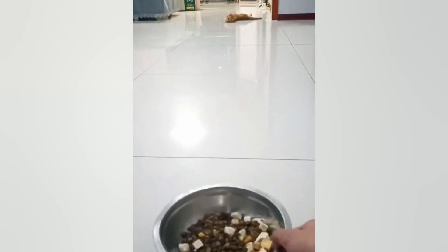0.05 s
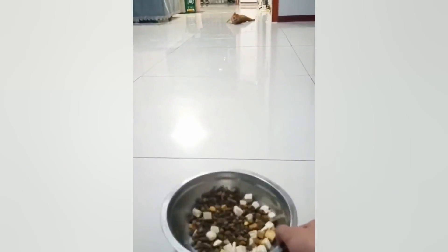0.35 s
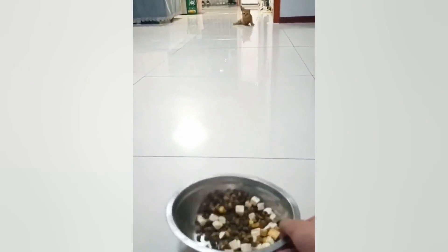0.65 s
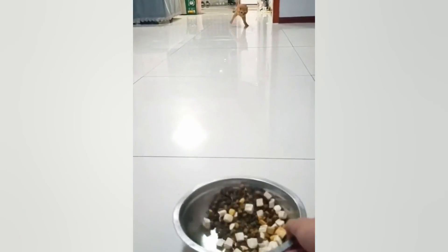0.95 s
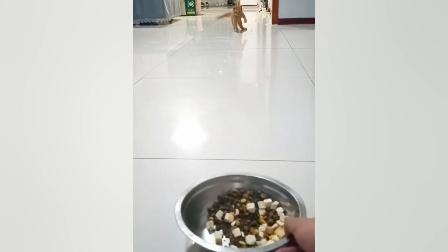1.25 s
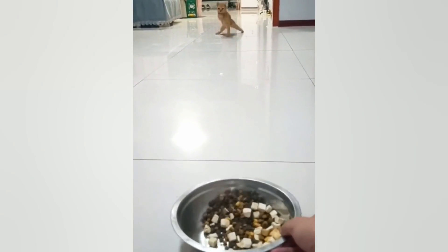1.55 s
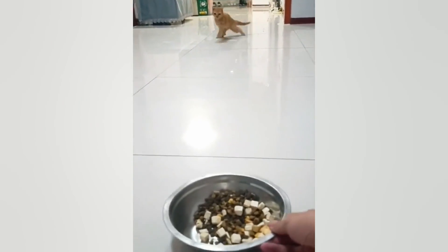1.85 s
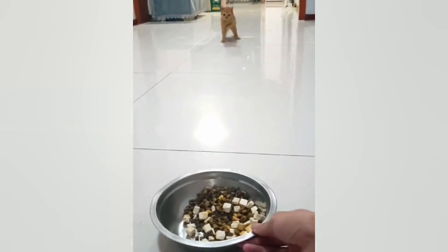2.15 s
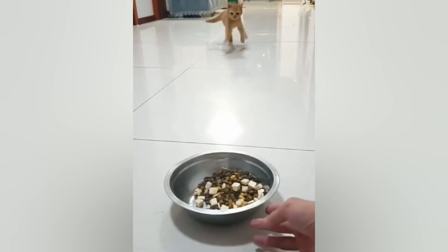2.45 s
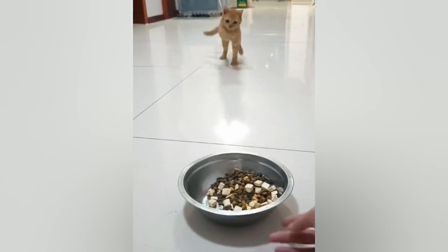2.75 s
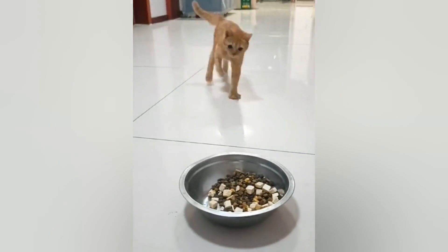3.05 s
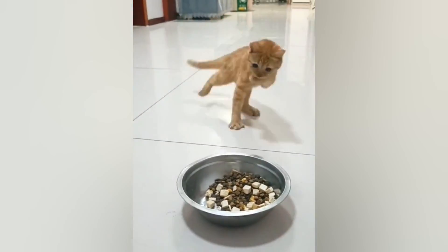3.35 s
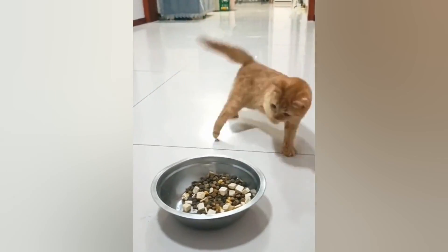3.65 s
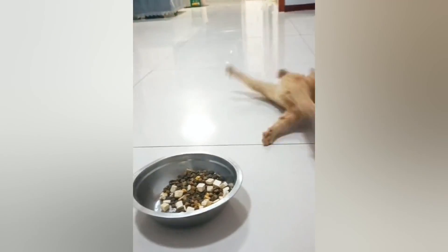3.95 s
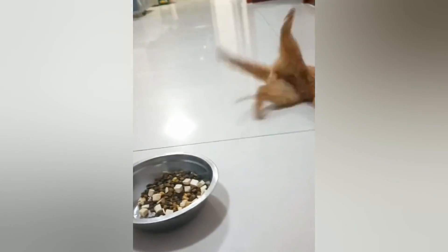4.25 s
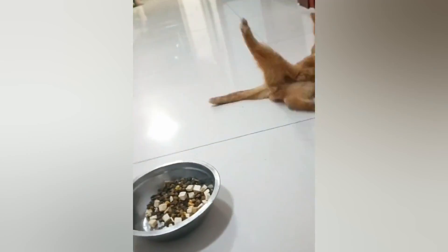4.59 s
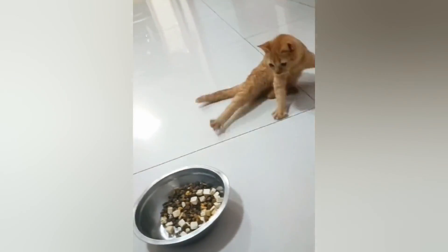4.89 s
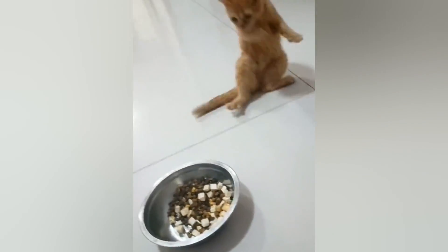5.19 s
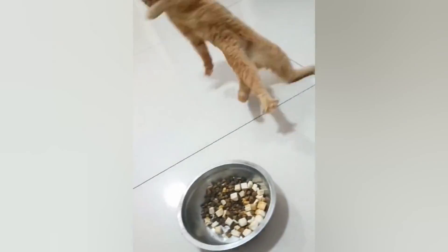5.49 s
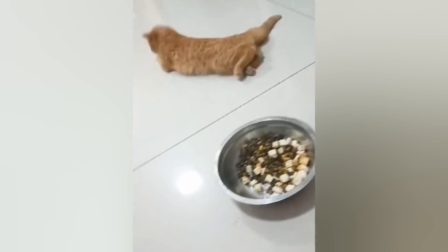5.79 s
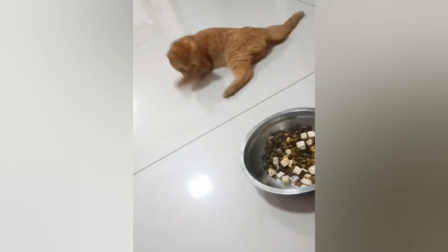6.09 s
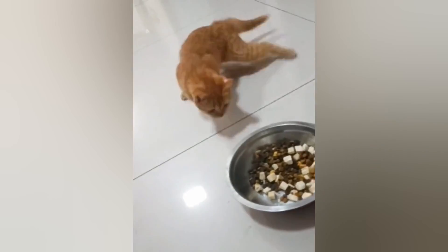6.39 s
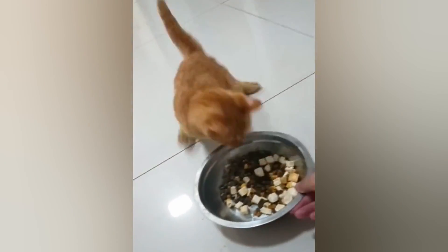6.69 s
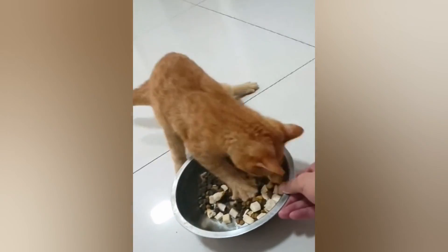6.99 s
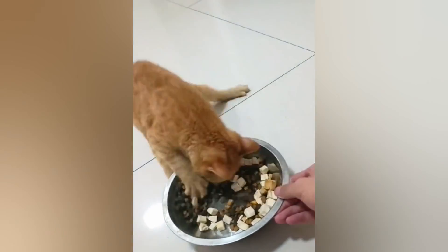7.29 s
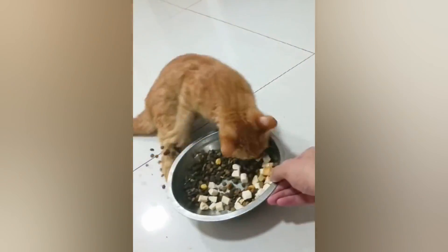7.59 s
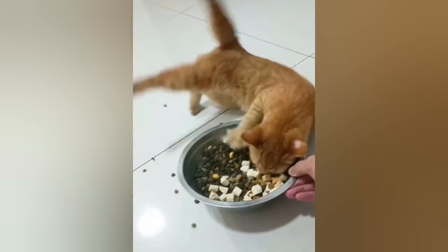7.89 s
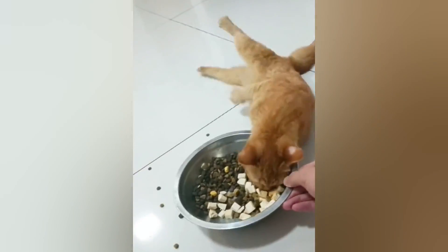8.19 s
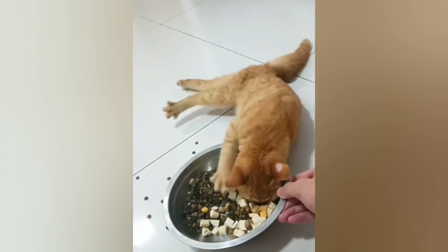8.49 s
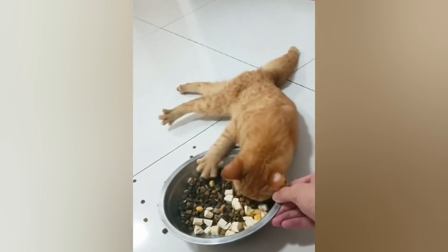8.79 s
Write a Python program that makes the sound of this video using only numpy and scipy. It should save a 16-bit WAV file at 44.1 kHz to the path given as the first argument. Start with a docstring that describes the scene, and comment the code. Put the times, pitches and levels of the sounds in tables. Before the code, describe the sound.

A steel bowl of dry cat food is shaken close by, each toss a bright shower of clicks with a short metallic ring. A kitten then gallops closer on softly thudding paws and ticking claws, skids and tumbles with a hiss of fur. It pounces into the bowl, rustling through the pellets and crunching them. The tiled room echoes.

```python
"""A steel bowl of dry cat food is shaken close by in a tiled, echoing room.
Each toss lands as a shower of tiny clicks that sets the steel ringing.
A kitten gallops up on thudding paws and ticking claws, skids and tumbles with a hiss of fur,
then pounces into the bowl, pushes through the pellets with its nose and crunches them."""
import sys
import numpy as np
from scipy import signal
from scipy.fft import rfft, irfft, next_fast_len
from scipy.io import wavfile
from scipy.ndimage import map_coordinates

SR = 44100
rng = np.random.default_rng(int(sys.argv[2]) if len(sys.argv) > 2 else 0)


def generate_wav(signal):
    """Clip the signal to [-1, 1] and save it as 16-bit WAV at the path in sys.argv[1]."""
    frames = np.transpose(np.atleast_2d(signal))
    scaled = np.clip(frames, -1, 1) * 32767
    pcm = np.round(scaled).astype(np.int16)
    wavfile.write(sys.argv[1], SR, pcm)


N = 398663
TOP_HZ = 16000

# tossed food lands in the bowl: t/s, clatter/dB, knock/dB, scatter/s, rim/dB, clack/dB, clack pitch/Hz
TOSSES = [(0.0, -18.5, -27, 0.0091, -35, -30.5, 2840), (0.139, -30, -44, .016, -52.5, -43.5, 3000),
          (.354, -16.5, -38, .0047, -47, -37, 3400), (.486, -23.5, -29, .007, -48, -35.5, 3380),
          (.654, -14.5, -30, 0.0063, -43, -27, 3240), (.864, -16.5, -27, .003, -49, -22.5, 3000),
          (.877, -18.5, -42, .0013, -50, -32, 3400), (1.041, -13.5, -20.5, 0.0015, -42, -27, 3500),
          (1.2145, -14, -20, .0009, -49.5, -24, 3620), (1.3939, -15.5, -23.5, 0.00089, -54, -25, 3130),
          (1.548, -16, -22.5, 0.0011, -44, -26, 3000), (1.8322, -23.5, -57, .0018, -62, -59, 2850),
          (1.988, -37.5, -69, 0.0042, -66, -44, 3430), (2.175, -29, -55, 0.0057, -55, -55, 3000),
          (2.214, -34, -37, .011, -66, -54, 2870)]
# paws and body land on the tiles: t/s, thud/dB, thud pitch/Hz, pad slap/dB, claw tick/dB, thud decay/s
LANDINGS = [(2.031, -36.5, 258, -65, -54.5, 0.037), (2.408, -32.5, 466, -45, -56, .015),
            (2.425, -49, 450, -48, -53.5, .012), (2.572, -34, 560, -49, -57.5, 0.025),
            (2.738, -37, 495, -50, -59.5, 0.011), (2.887, -35, 344, -52, -82.5, .016),
            (2.93, -49, 218, -56.5, -42.5, 0.013), (3.1, -33.5, 401, -51, -41, 0.014),
            (3.347, -35.5, 429, -47, -45.5, .0088), (3.538, -41, 375, -46, -60, 0.024),
            (3.606, -41.5, 502, -41.5, -41.5, 0.017), (3.665, -35, 213, -60, -53, 0.019),
            (3.747, -23.5, 550, -32, -33, 0.0043), (3.796, -37, 523, -52, -59.5, 0.0094),
            (3.852, -21.5, 346, -46, -53, .012), (4.035, -35.5, 259.9, -46.5, -46, 0.017),
            (4.095, -29, 300, -46, -66, .012), (4.187, -19, 476, -40, -43, 0.014),
            (4.206, -24, 486, -39.5, -46, 0.012), (4.297, -38, 520, -44, -52, .009),
            (4.471, -50, 416, -52, -31, .012), (4.512, -30, 237, -39.5, -31.5, 0.019),
            (4.548, -29, 520, -36.5, -28, 0.012), (4.831, -31.5, 233, -62.5, -64.5, 0.0075),
            (4.944, -22, 290, -38.5, -36.5, 0.0063), (4.956, -25, 234, -64, -53.5, .02),
            (4.998, -30, 231, -47, -67.5, 0.014), (5.204, -47.5, 350, -58, -56, 0.02),
            (5.234, -35, 410, -50.5, -54, 0.032), (5.961, -54, 352, -75.5, -62.5, 0.01),
            (6.052, -42, 330, -66, -66, .009), (6.212, -47.5, 228, -68, -58.5, 0.013),
            (6.27, -36, 322, -50, -51.5, .014)]
# tone of a dull knock on the bowl: f/Hz, level/dB
KNOCK_TONE = [(30, -17.5), (70, -18.5), (150, -8.5), (230, -2), (340, -1.5), (480, -1.5), (750, -6),
              (1100, -9.5), (1600, -18), (4000, -48)]


def amp(db):
    """Turn decibels into a gain."""
    return 10 ** (np.asarray(db) / 20)


def along(points, hz):
    """Read a (f/Hz, value) table at any frequency, on a log axis."""
    f, values = np.transpose(points)
    return np.interp(np.log(hz + 1), np.log(f), values)


def level(curve, times):
    """Read a (t/s, level/dB) curve, which is silent beyond its ends."""
    return np.interp(times, *np.transpose(curve), left=-140, right=-140)


def add(track, start, sound):
    """Mix a sound into a track at `start` seconds."""
    part = track[..., max(round(start * SR), 0):][..., :sound.shape[-1]]
    part += sound[..., :part.shape[-1]]


def filtered(x, response):
    """Scale each frequency of x by response(hz)."""
    size = next_fast_len(N + SR // 4)
    return irfft(rfft(x, size) * response(np.fft.rfftfreq(size, 1 / SR)), size)[..., :N]


def convolved(x, kernel):
    """Pass x through a filter, given as its answer to one click."""
    return signal.oaconvolve(x, np.atleast_2d(kernel), axes=1)[:, :N]


def coloured(x, tone, size=4096):
    """Give x a (f/Hz, level/dB) tone; white noise keeps its power."""
    cepstrum = irfft(np.log(amp(along(tone, np.fft.rfftfreq(size, 1 / SR)))))
    # folded so that the filter never sounds ahead of a hit
    cepstrum[1:size // 2] *= 2
    cepstrum[size // 2:] = 0
    kernel = irfft(np.exp(rfft(cepstrum)))
    return convolved(x, kernel / np.linalg.norm(kernel))


def changing(x, kernels):
    """Pass x through filters that fade into each other, one round a second."""
    turn = np.arange(N) / SR + np.arange(len(kernels))[:, None] / len(kernels)
    shares = np.maximum(np.cos(2 * np.pi * turn), 0)
    shares /= np.linalg.norm(shares, axis=0)
    return sum(convolved(x * share, kernel / np.linalg.norm(kernel[0]))
               for share, kernel in zip(shares, kernels))


def wavering(hz, width_hz, t):
    """A tone that drifts at random, blurring its pitch over width_hz."""
    drift = np.cumsum(rng.standard_normal(len(t))) * np.sqrt(2 * np.pi * width_hz / SR)
    return np.sin(2 * np.pi * hz * t + drift)


def ringing(tones, width_hz, t):
    """Wavering tones, each fading by 60 dB in its ring time."""
    return sum(amp(db - 60 * t / ring_s) * wavering(hz, width_hz, t) for hz, db, ring_s in tones)


def band_noise(hz, width_share, t):
    """Stereo noise of strength 1 in a band around hz."""
    edges = np.clip(hz * np.exp(width_share * np.array([-.5, .5])), 20, SR * .48)
    band = signal.butter(2, edges, "band", fs=SR, output="sos")
    noise = signal.sosfilt(band, rng.standard_normal((2, 2 * len(t))))[:, len(t):]
    return noise / noise.std()


def swelling_noise(curve):
    """Stereo white noise, as loud as the curve says."""
    return amp(level(curve, np.arange(N) / SR)) * rng.standard_normal((2, N))


def strokes(start, length, db, rise_s, fall_db_per_s):
    """A (t/s, level/dB) curve of strokes that swell, hold and die away."""
    times = np.linspace(start[0], min(start[-1] + length[-1] + .5, N / SR), 1500)
    age = times[:, None] - start
    gain = np.clip(age / rise_s, 0, 1) * amp(db - fall_db_per_s * np.maximum(age - length, 0))
    return np.column_stack([times, 10 * np.log10(np.sum(gain ** 2, axis=1) + 1e-14)])


def clicks(times, db, rate, uneven_db, decay_s=.00015, size=48):
    """Tiny hard hits, each at its own pitch; `rate` of them a second make the level db."""
    t, count = np.arange(size) / SR, len(times)
    pitch = rng.uniform(0, TOP_HZ, (count, 1))
    phase = rng.uniform(0, 2 * np.pi, (count, 1))
    phase = phase + 1.2 * rng.standard_normal((2, count, 1))  # sets left and right apart
    shape = np.cos(2 * np.pi * pitch * t + phase) * np.exp(-t / decay_s)
    strength = amp(uneven_db * np.clip(rng.standard_normal(count), -2, 2))
    gain = amp(db) * np.sqrt(SR / rate) * strength / np.sqrt(np.mean(strength ** 2))
    shape *= gain[:, None] / np.linalg.norm(shape, axis=2, keepdims=True)
    where = (np.abs(times * SR).astype(int)[:, None] + np.arange(size)).ravel()
    return np.array([np.bincount(where, side.ravel(), N)[:N] for side in shape])


def showers(starts, db, scatter_s, uneven_db, count):
    """From each start, clicks thicken for scatter_s and then thin out."""
    shape = (len(starts), count)
    scatter_s = np.broadcast_to(scatter_s, len(starts))
    times = starts[:, None] - scatter_s[:, None] * np.log(rng.random(shape) * rng.random(shape))
    peak_rate = count / (np.e * scatter_s)
    return clicks(times.ravel(), np.repeat(db, count), np.repeat(peak_rate, count), uneven_db)


def trickle(curve, uneven_db, count):
    """Clicks at random moments, as loud as the curve says."""
    start, end = curve[0][0], curve[-1][0]
    times = rng.uniform(start, end, count)
    return clicks(times, level(curve, times), count / (end - start), uneven_db)


def struck(hit, tones, crack_db, crack_s, width_hz):
    """One hard hit: a crack of noise and a short, rough ring."""
    out, t = np.zeros((2, N)), np.arange(SR // 2) / SR
    start, db = hit
    ring = ringing(tones, width_hz, t)
    crack = amp(crack_db) * np.exp(-t / crack_s) * rng.standard_normal((2, len(t)))
    add(out, start, amp(db) * (ring / 2 + crack))
    return out


def rasps(rows, gain_db, width_share, rise_s, grit_db, grit_s):
    """Short rubs: bands of noise made gritty by a flickering level."""
    out, t = np.zeros((2, N)), np.arange(SR // 4) / SR
    for start, db, hz, decay_s in rows:
        grit = map_coordinates(rng.standard_normal(len(t)), [t / grit_s])
        envelope = (1 - np.exp(-t / rise_s)) * np.exp(-t / decay_s)
        add(out, start, amp(db + gain_db + grit_db * grit) * envelope * band_noise(hz, width_share, t))
    return out


def hush():
    """The faint, steady noise of a quiet room."""
    # tone of the hush: f/Hz, level/dB
    tone = [(25, -19.5), (70, -1), (170, 3.5), (400, 3.5), (700, -5), (1200, -18), (2200, -4),
            (3500, -13.5), (8000, -15), (16000, -21)]
    return amp(-71) * coloured(rng.standard_normal((2, N)), tone)


def room(x, echo_db, build_s=.003, walls_s=.04, spread_s=.025, walls_db=2.5):
    """Tiles and bare walls add a dense, shifting echo that swells as the far walls reply."""
    # how long the echo takes to fade by 60 dB: f/Hz, time/s
    fade_times = [(100, 0.44), (400, 0.64), (1200, 0.68), (3000, 0.62), (8000, 0.46), (15000, 0.4)]
    hz, t, noise = signal.stft(rng.standard_normal((3, 2, SR * 5 // 8)), SR, nperseg=256)
    far_walls = amp(walls_db * np.exp(-((t - walls_s) / spread_s) ** 2))
    swell = (1 - np.exp(-t / build_s)) * far_walls
    fade = amp(-60 * t / along(fade_times, hz)[:, None])
    tails = signal.istft(noise * fade * swell, SR, nperseg=256)[1]
    return x + changing(x * amp(echo_db), tails)


def skids():
    """Fur and feet brush the floor: a grainy hiss over a low rub."""
    # the run-up, then each skid or roll: t/s, length/s, hiss/dB, rub/dB
    brushes = [(1.598, 2.07, -60, -58.5), (3.76, 0.14, -49, -42), (3.91, .12, -54, -54),
               (4.062, 0.16, -42, -45), (4.206, 0.19, -40, -52), (4.43, 0.59, -45.5, -55),
               (5.25, 0.17, -61, -62.5), (5.458, 0.24, -59.5, -71.5), (5.86, 0.061, -61, -94),
               (6.258, 0.083, -45, -53)]
    # tones of the hiss and the rub: f/Hz, level/dB
    fur_tone = [(300, -20), (900, 0), (2300, -2.5), (4500, -3.5), (7600, -0.5), (12000, 10), (16000, -5)]
    rub_tone = [(30, -22), (50, -26.5), (75, -5.5), (130, 1), (220, -1.5), (420, -4.5), (700, -15.5),
                (1500, -40), (4000, -40)]
    start, length, *levels = np.transpose(brushes)
    hiss, rub = (strokes(start, length, db, rise_s=.022, fall_db_per_s=211) for db in levels)
    grains = trickle(hiss, uneven_db=2, count=16000)
    return amp(-4) * (coloured(grains, fur_tone) + coloured(swelling_noise(rub), rub_tone))


def claw_drags():
    """Claws drag over the glaze with a thin, whistling hiss."""
    # each drag: t/s, level/dB, f/Hz, decay/s
    drags = [(2.93, -42, 13500, .012), (3.108, -39, 11200, .03), (3.705, -47, 12800, .014),
             (4.64, -47, 11800, .06), (4.75, -45, 11300, .06), (4.84, -44, 10800, .06),
             (5.218, -48, 12000, .02)]
    return rasps(drags, gain_db=-1, width_share=.13, rise_s=.012, grit_db=2.5, grit_s=.006)


def pad_scuffs():
    """A paw's pad rubs on the tile as it lands."""
    # each scuff: t/s, level/dB, f/Hz, decay/s
    scuffs = [(2.42, -37, 2550, .011), (2.739, -48, 2400, .007), (2.887, -48, 2700, .011),
              (3.347, -45, 2550, .004), (3.538, -52, 3100, .006), (3.606, -46, 2900, .008),
              (3.7485, -25, 3000, .005), (4.21, -45, 2300, .025), (4.296, -44, 2500, .008),
              (4.549, -37, 2700, .011)]
    return rasps(scuffs, gain_db=.5, width_share=.33, rise_s=.0008, grit_db=2.5, grit_s=.002)


def stamp_and_tick():
    """A paw stamps as the kitten brakes; a small, hard tick comes just before the pounce."""
    # the two hits: t/s, level/dB
    stamp = (3.7495, -20.5)
    tick = (6.051, -36)
    # how each rings: f/Hz, level/dB, ring time/s
    stamp_tones = [(552, -0.35, 0.028), (2670, -1, .017), (3240, -1, .017)]
    tick_tones = [(1062, -9, .1), (1138, -2, 0.12), (1860, -8, 0.13), (2355, -9, 0.09), (2400, -14, .18),
                  (2725, -1, 0.03), (3100, -12, .05), (5755, -8, .08), (6368, -6, .09), (7872, -5, .09)]
    return (struck(tick, tick_tones, crack_db=-5, crack_s=.004, width_hz=24)
            + struck(stamp, stamp_tones, crack_db=-18, crack_s=.002, width_hz=81))


def paws():
    """Pads slap on the tiles while the claws tick."""
    # tones of a pad and a claw: f/Hz, level/dB
    pad_tone = [(300, -9), (900, -11), (1600, -7.5), (2200, -4.5), (2600, -3.5), (3200, -6), (4200, -12.5),
                (7000, -11), (16000, -32.5)]
    claw_tone = [(500, -8.5), (2000, -26), (4500, -5.5), (6000, -3), (7800, 1.5), (12000, 0), (16000, -2)]
    starts, _, _, slap_db, tick_db, _ = np.transpose(LANDINGS)
    slaps = showers(starts, slap_db, scatter_s=.002, uneven_db=3.5, count=80)
    ticks = showers(starts, tick_db, scatter_s=.0046, uneven_db=1.5, count=80)
    return coloured(slaps, pad_tone) + coloured(ticks, claw_tone)


def thuds(rise_share=.43):
    """Soft weight meets the floor: a hollow tone blurred by noise; longer thuds rise more slowly."""
    out, t = np.zeros((2, N)), np.arange(SR // 5) / SR
    for start, db, hz, _, _, decay_s in LANDINGS:
        blur = .98 * band_noise(hz * .79, .95, t)[0]
        age = t / decay_s
        envelope = np.exp(-age) * (1 - np.exp(-age / rise_share))
        add(out, start, amp(db - 5) * envelope * (np.sin(2 * np.pi * hz * t) + blur))
    return out


def kitten():
    """The kitten romps over the tiles; the nearer it is, the less echo comes with it."""
    # echo of its sharper sounds: t/s, level/dB
    echo = [(2.0, 7.5), (3.5, 5), (3.75, 2.5), (4.2, 4.5), (6.0, 2)]
    # its level dips briefly after the tumble: t/s, level/dB
    dip = [(5.04, -3.5), (5.07, -12), (5.18, -11), (5.2, 1)]
    t = np.arange(N) / SR
    hits, scuffs, drags = stamp_and_tick(), pad_scuffs(), claw_drags()
    sharp = room(paws() + hits + skids() + drags, echo_db=np.interp(t, *np.transpose(echo)))
    soft = room(thuds() + scuffs, echo_db=-1.5)
    return (sharp + soft) * amp(np.interp(t, *np.transpose(dip)))


def bowl(x, ring_db, width_share=.016, detune_share=.025):
    """Hits set the steel ringing; the loose food blurs and shifts each tone as it moves."""
    # tones of the filled bowl: f/Hz, level/dB, ring time/s
    tones = [(228.5, -3, 0.17), (350, -16, 0.22), (410, -10, .12), (522, -10, .4), (703, -18.5, .2),
             (1083, -7, .3), (1920, -20, .143), (2760, -11, .05), (3370, -7.5, 0.054), (4100, -10, .05),
             (5700, -10, 0.044), (6540, -1, .04), (6820, -0.5, 0.037), (7400, 4, .05), (7785, 1, 0.055),
             (8370, 5.5, 0.04)]
    t = np.arange(SR // 3) / SR

    def tone(hz, db, ring_s):
        pitch = hz * (1 + detune_share * rng.uniform(-.88, 1))
        return amp(db - 60 * t / ring_s) * wavering(pitch, width_share * hz, t) / np.sqrt(ring_s)

    rings = np.array([[sum(tone(*row) for row in tones) for side in range(2)] for turn in range(3)])
    return x + amp(ring_db) * changing(x, rings)


def crunching():
    """Teeth and muzzle crunch into the food."""
    # each bite: t/s, level/dB, f/Hz, decay/s
    bites = [(6.588, -37, 2896, 0.029), (6.628, -44, 2820, 0.019), (6.808, -34.5, 2730, 0.013),
             (6.842, -43, 2590, 0.011), (6.9, -34, 2575, .015), (7.4159, -45, 2880, 0.0051),
             (7.491, -44.5, 2830, 0.012), (7.719, -47, 2850, 0.016), (8.032, -54, 2770, 0.019),
             (8.0884, -43, 2950, .007), (8.1149, -45, 2880, 0.011), (8.15, -46, 2650, .009),
             (8.292, -46, 2710, 0.011), (8.4483, -46, 2540, .012), (8.565, -43.5, 2650, 0.018),
             (8.594, -52.5, 2920, 0.012), (8.635, -50, 3430, 0.01)]
    return rasps(bites, gain_db=-1, width_share=.3, rise_s=.0019, grit_db=3, grit_s=.002)


def rooting():
    """Nose and paws plough through the food, flick pellets at the wall and jostle the bowl."""
    # pellets knocked against the steel: t/s, level/dB, scatter/s
    nudges = [(6.064, -42, .009), (6.362, -39.5, .011), (6.395, -23, .006), (6.41, -29.5, .005),
              (6.586, -37.5, 0.0089), (6.631, -28, .004), (6.682, -32.5, .007), (6.808, -37.5, 0.0028),
              (6.841, -29, 0.0018), (6.897, -29, 0.0072), (6.919, -23.5, 0.0033), (6.936, -36, 0.0062),
              (7.104, -33.5, .004), (7.355, -46, .014), (7.419, -39, 0.0028), (7.511, -33, .002),
              (7.552, -34, .002), (7.716, -36.5, 0.0032), (8.145, -40, 0.0081), (8.2, -43, .004),
              (8.299, -43, .008), (8.462, -39, .0037), (8.566, -38, .003), (8.64, -35, .0034),
              (8.729, -39, .002), (8.975, -43, .0015)]
    # pushes through the food: t/s, length/s, rustle/dB, scrape/dB, bump/dB
    pushes = [(6.388, 0.017, -26, -29.5, -45), (6.558, 0.072, -32.5, -48.5, -60),
              (6.799, .04, -27.5, -45, -51.5), (6.874, 0.049, -31.5, -37, -53), (7.016, 0.1, -32, -53, -55),
              (7.189, 0.066, -38, -56, -57), (7.471, 0.049, -36.5, -51, -70),
              (7.705, 0.038, -34.5, -46, -60), (8.039, 0.069, -49.5, -50.5, -56),
              (8.098, 0.093, -38, -47.5, -78), (8.284, 0.033, -37, -52.5, -48),
              (8.438, 0.035, -43, -56.5, -75), (8.552, 0.032, -47, -45, -58),
              (8.717, .26, -39.5, -53, -53.5)]
    # the muzzle keeps the food stirring: t/s, level/dB
    stirring = [(6.3, -63), (6.55, -44), (7.1, -41.5), (7.33, -44.5), (7.6, -43.5), (7.85, -45),
                (8.03, -47.5), (8.15, -44.5), (8.4, -44.5), (9.04, -43.5)]
    # tones of the bright rustle and the gritty scrape: f/Hz, level/dB
    rustle_tone = [(60, -24), (200, -17.5), (400, -27), (750, -25), (1300, -16), (2400, -12), (4300, -17),
                   (5200, -13), (5800, -10), (7800, -3), (12000, 0), (16000, -12.5)]
    scrape_tone = [(300, -21), (800, -12), (1100, -5.5), (1400, -12), (2000, -6.5), (2800, -0.5),
                   (3400, -2), (4300, -1.5), (8000, -18.5)]
    start, length, *levels = np.transpose(pushes)
    rustle, scrape, bump = (strokes(start, length, db, rise_s=.011, fall_db_per_s=300.5)
                            for db in levels)
    bright = showers(*np.transpose(nudges), uneven_db=0, count=60)
    bright += amp(-6) * trickle(rustle, uneven_db=1.5, count=2800)
    bright += amp(-7) * trickle(stirring, uneven_db=1.5, count=2200)
    gritty = amp(-6) * trickle(scrape, uneven_db=4.5, count=5000)
    gritty += amp(-21) * trickle(stirring, uneven_db=3, count=1000)
    dull = amp(-5) * swelling_noise(bump) + amp(-19) * swelling_noise(stirring)
    food = coloured(bright, rustle_tone) + coloured(gritty, scrape_tone) + coloured(dull, KNOCK_TONE)
    return bowl(food, ring_db=-15.5)


def crumbs():
    """Light crumbs skitter over the steel with a fine, high fizz."""
    # each skitter: t/s, level/dB, scatter/s
    skitters = [(1.43, -30, .012), (1.575, -32, .012), (1.78, -31, .012), (1.832, -21, .002),
                (1.862, -28, .012), (1.982, -33, .005), (2.176, -28, .004), (2.21, -35, .012)]
    # tone of the fizz: f/Hz, level/dB
    fizz_tone = [(3000, -40), (7000, -16), (9500, 0), (13000, 1), (16000, -4)]
    return coloured(showers(*np.transpose(skitters), uneven_db=2.5, count=90), fizz_tone)


def cracks(decay_s=.0009):
    """Single pellets strike the steel or crack, sharp and close."""
    # each snap: t/s, level/dB, f/Hz
    snaps = [(.3585, -11, 8000), (.3635, -11, 7500), (.8678, -9, 3600), (.8702, -10, 6500),
             (.8788, -10, 7000), (1.0438, -7, 7000), (1.2158, -5, 5500), (1.2177, -9, 5500),
             (1.3953, -7, 4400), (1.5505, -11, 6000), (1.8344, -15, 9600), (6.4007, -17.5, 5850),
             (6.6352, -24, 8000), (6.8122, -27, 5100), (6.8432, -18, 6000), (6.9225, -14, 6300),
             (6.941, -15, 6500), (7.0144, -24, 4800), (7.1628, -30, 7900), (7.421, -32, 8500),
             (7.5125, -35, 7500), (7.558, -29, 8000), (7.7192, -31, 7000), (7.8755, -40, 5000),
             (7.9124, -33, 8500), (8.043, -41, 3600), (8.0902, -35, 3900), (8.2072, -31, 6900),
             (8.5666, -31, 5000), (8.5716, -33, 6900), (8.651, -29, 7500), (8.9742, -24.5, 4400)]
    out, t = np.zeros((2, N)), np.arange(SR // 50) / SR
    for start, db, hz in snaps:
        add(out, start, amp(db - 3) * np.exp(-t / decay_s) * band_noise(hz, 1.1, t))
    return out


def pings(spread_s=.028, decay_s=.0016, low_hz=5200, high_hz=8800, count=9):
    """After each toss, single pellets hop against bare steel; later ones ping more softly."""
    out, t = np.zeros((2, N)), np.arange(SR // 50) / SR
    for start, db, *_ in TOSSES:
        for energy, place, left, right in rng.random((count, 4)):
            hz = low_hz + place * (high_hz - low_hz)
            ring = np.exp(-t / decay_s) * np.sin(2 * np.pi * (hz * t + np.array([[left], [right]])))
            add(out, start - spread_s * np.log(energy), amp(db - 7) * np.sqrt(energy) * ring)
    return out


def pellets():
    """Each toss lands as a shower: a few pellets come early, some bounce, the rest slide on."""
    # pellets slide over each other while the bowl is shaken: t/s, level/dB
    sliding = [(0.0, -29), (.27, -34), (.34, -30.5), (.42, -36), (.6, -35.5), (.8, -31), (.98, -26.5),
               (1.3, -39), (1.65, -45.5), (1.82, -32), (2.15, -44), (2.4, -58)]
    # tone of the clatter: f/Hz, level/dB
    tone = [(60, -15.5), (200, -11.5), (400, -7.5), (800, -14.5), (1400, -12.3), (2200, -7.7), (3100, -9.5),
            (4200, -7), (6000, -5.5), (7600, 1.5), (8500, 1), (12000, 3), (16000, -6.5)]
    starts, db, _, scatter_s, *_ = np.transpose(TOSSES)
    landing = showers(starts, db, scatter_s, uneven_db=.5, count=130)
    bounces = showers(starts + scatter_s, db - 15, scatter_s=.02, uneven_db=4, count=55)
    early = showers(starts - 1.9 * scatter_s, db - 14, scatter_s, uneven_db=2.5, count=60)
    slide = amp(-4) * trickle(sliding, uneven_db=3, count=2600)
    return coloured(early + landing + bounces + slide, tone)


def shaking(knock_s=.0017, rim_width_hz=17):
    """Tossed food clacks on the wall, rings the rim and knocks the bowl; gives (rattle, knocks)."""
    # the rim's clear tones: f/Hz, level/dB, ring time/s
    rim_tones = [(501, -8, .6), (554, -6, .5), (1038, -0.5, .65), (1105, -3, .25), (1211, -2, .18)]
    knocks, steel, t = np.zeros((2, N)), np.zeros((2, N)), np.arange(SR * 3 // 4) / SR
    for start, _, knock_db, scatter_s, rim_db, clack_db, clack_hz in TOSSES:
        knock = np.sqrt(t / knock_s * np.exp(1 - t / knock_s)) * rng.standard_normal(len(t))
        add(knocks, start, amp(knock_db) * knock)
        age = t / (scatter_s + .00061)
        # the wall's pitch depends on where the food meets it
        clack = np.sqrt(age * np.exp(1 - age)) * band_noise(clack_hz, .35, t)
        rim = (1 - np.exp(-age)) * ringing(rim_tones, rim_width_hz, t)
        add(steel, start, amp(clack_db - 1) * clack + amp(rim_db) * rim)
    rattle = bowl(pellets(), ring_db=-14.5) + steel + pings()
    return rattle, bowl(amp(-2) * coloured(knocks, KNOCK_TONE), ring_db=-18.5)


def scene():
    """The bowl is near and the kitten's feet farther off, over a faint hush."""
    background = hush()
    rattle, knocks = shaking()
    bites = crunching()
    shaken = room(rattle + crumbs(), echo_db=1.5) + room(knocks, echo_db=0)
    eating = room(rooting() + bites, echo_db=1)
    return background + shaken + eating + cracks() + kitten()


def record(dry, ceiling=.7):
    """A phone's two microphones: alike in the bass, the right one brighter, loud peaks rounded off."""
    # stereo width, small for long waves: f/Hz, level/dB
    width = [(60, -13.5), (300, -13), (600, -8), (1100, -2), (16000, 0.5)]
    # the phone's openings weaken deep bass and top treble: f/Hz, level/dB
    openings = [(25, -11), (50, -15), (75, -2.5), (8580, -1.5), (8850, -13)]
    # balance between the microphones: f/Hz, left minus right/dB
    balance = [(100, -1.5), (1100, -1.5), (1800, -6), (2700, -8), (3800, -1.5), (6500, 0.5), (8000, -6.5),
               (9500, -7.5), (16000, -12.5)]
    mid = (dry[0] + dry[1]) / 2
    side = filtered((dry[0] - dry[1]) / 2, lambda hz: amp(along(width, hz)))
    pair = filtered(np.array([mid + side, mid - side]),
                    lambda hz: amp(along(openings, hz) + np.outer([.5, -.5], along(balance, hz)) + 2.5))
    rounded = pair / (1 + (pair / ceiling) ** 4) ** .25
    return filtered(rounded, lambda hz: hz < TOP_HZ)


dry = scene()
out = record(dry)
generate_wav(out)
```